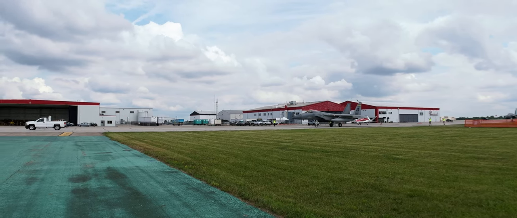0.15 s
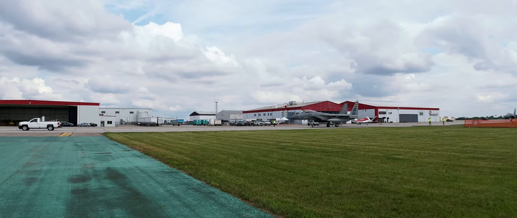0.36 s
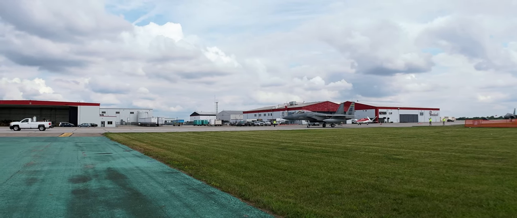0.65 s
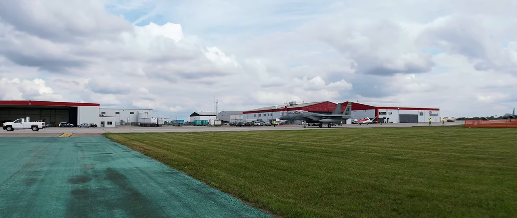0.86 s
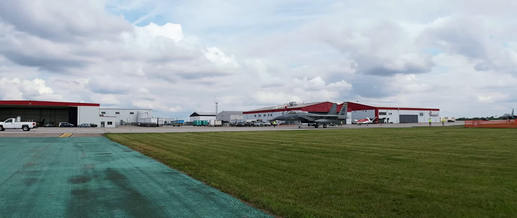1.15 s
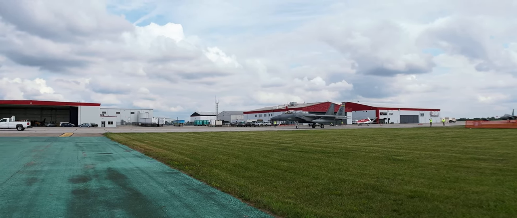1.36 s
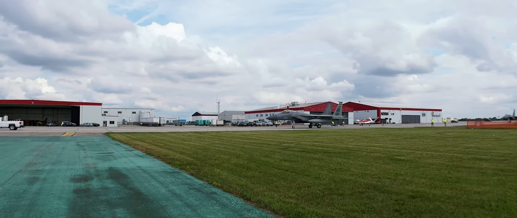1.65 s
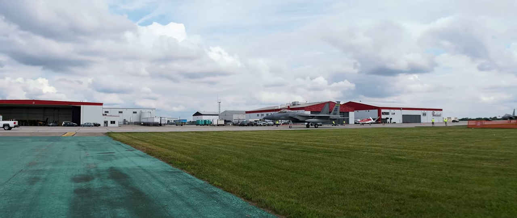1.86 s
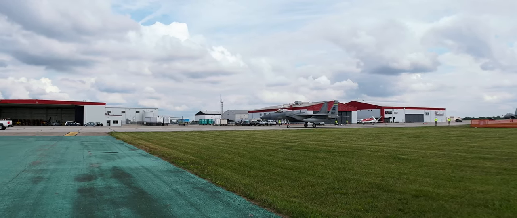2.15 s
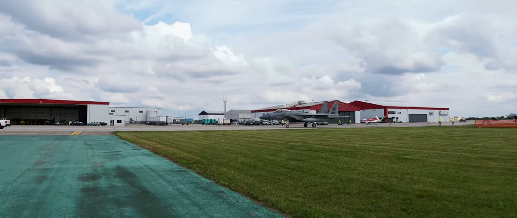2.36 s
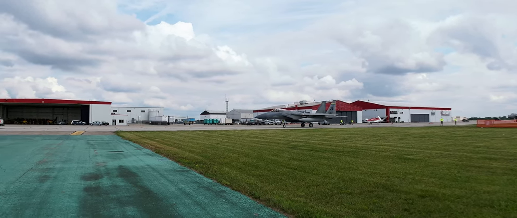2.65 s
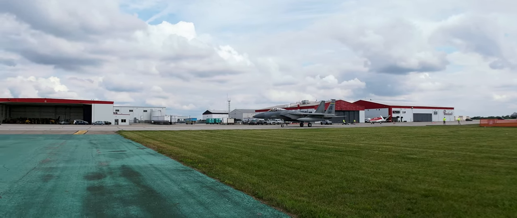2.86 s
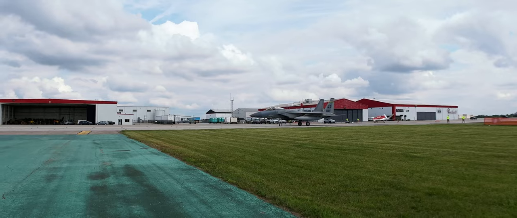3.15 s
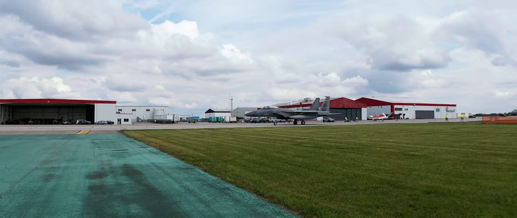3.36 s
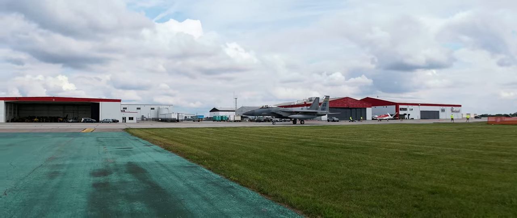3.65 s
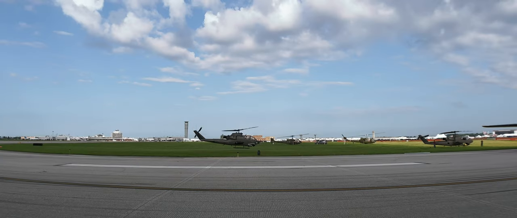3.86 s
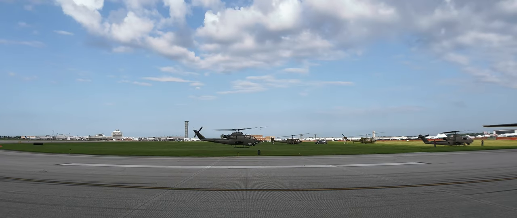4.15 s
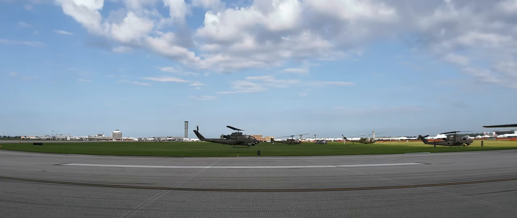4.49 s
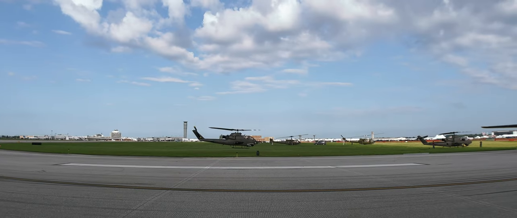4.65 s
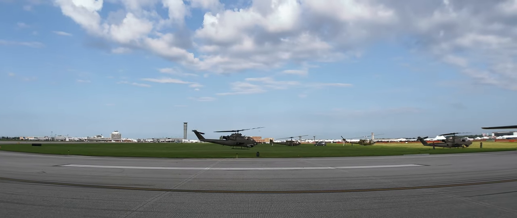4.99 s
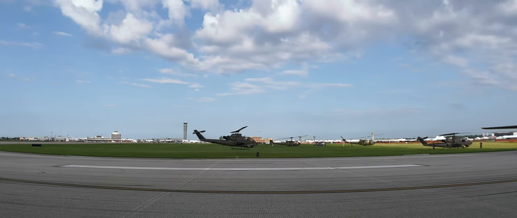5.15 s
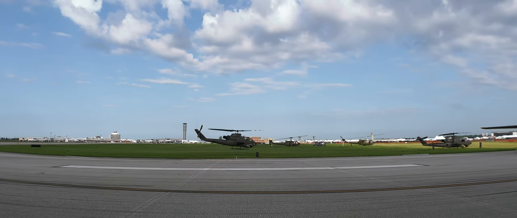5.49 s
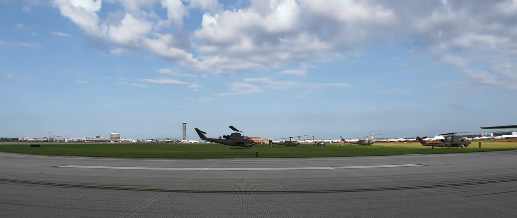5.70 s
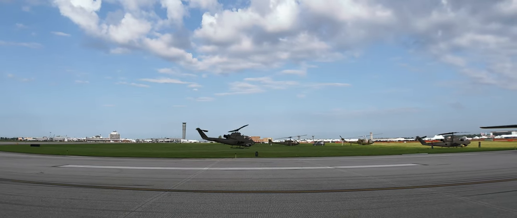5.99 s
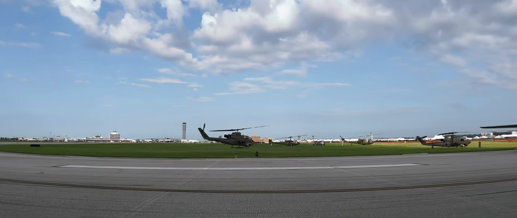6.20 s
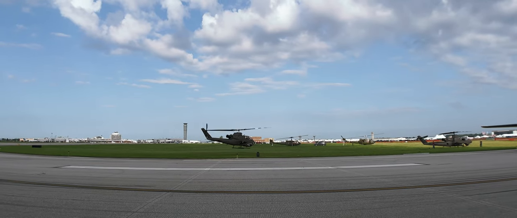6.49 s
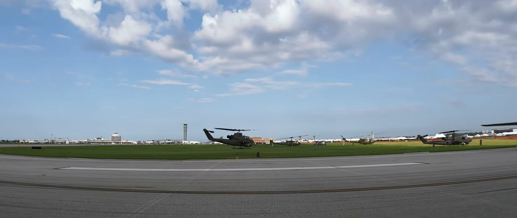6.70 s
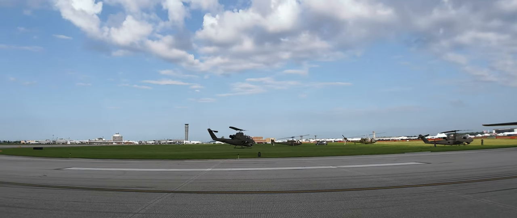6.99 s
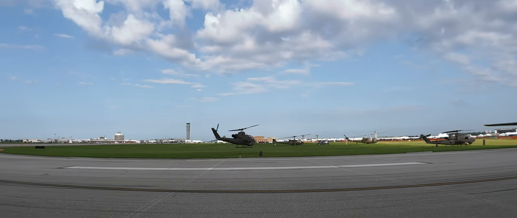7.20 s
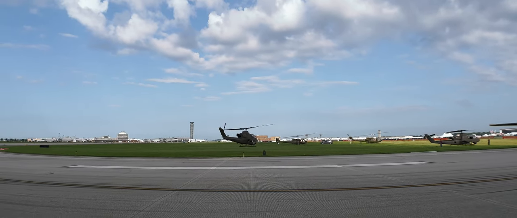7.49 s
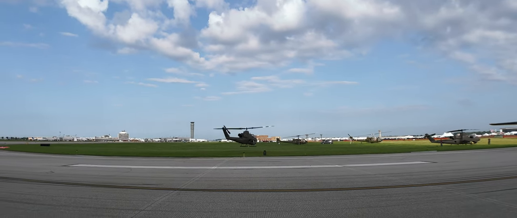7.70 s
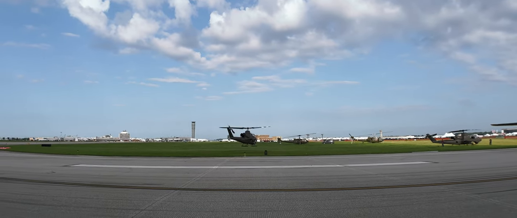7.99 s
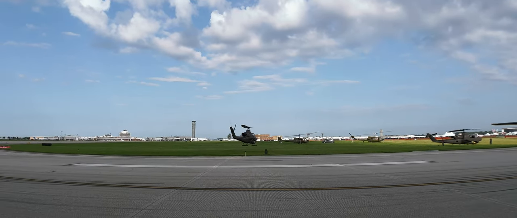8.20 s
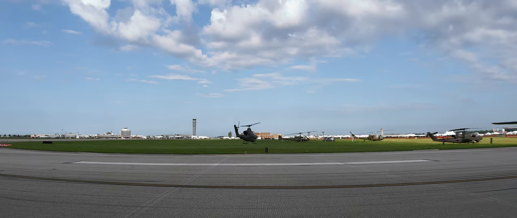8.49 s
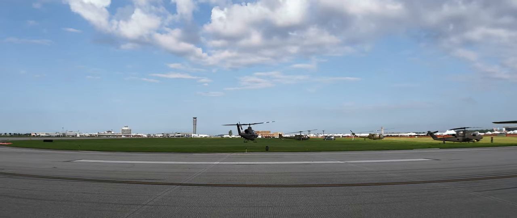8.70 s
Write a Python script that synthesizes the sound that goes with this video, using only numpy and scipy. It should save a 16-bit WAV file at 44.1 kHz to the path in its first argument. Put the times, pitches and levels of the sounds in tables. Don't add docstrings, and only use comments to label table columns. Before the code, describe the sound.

Quiet outdoor opening: wavering high jet whine and hiss, low gust rumbles and soft wind puffs right on a camera's microphones. A hard scene change brings a full, close helicopter hover, rapid even rotor chops over broad wash, raspy tail-rotor drone, faint very high turbine whistle and two dry grit ticks. Later the raspy wash eases, the tail buzz strengthens and sharp slaps mark every blade passage.

```python
import sys
import numpy as np
from scipy import signal
from scipy.fft import rfft, irfft, next_fast_len
from scipy.io import wavfile
from scipy.ndimage import uniform_filter1d

SR = 44100
rng = np.random.default_rng(int(sys.argv[2]) if len(sys.argv) > 2 else 0)


def wrap_up_sound(samples):
    columns = np.atleast_2d(samples).T
    tamed = np.clip(columns, -1, 1)
    steps = np.round(tamed * 32767).astype(np.int16)
    wavfile.write(sys.argv[1], SR, steps)


def voltage_ratio(decibels):
    exponent = np.asarray(decibels, float) / 20
    return 10 ** exponent


N = 389844
T = np.arange(N) / SR
SIZE = next_fast_len(N)
HZ = np.maximum(np.arange(SIZE // 2 + 1) * SR / SIZE, 1)

BLADE_HZ, BLADE_PASS_S = 10.8, 5.226
TAIL_HZ = 55.03


def unit(x):
    return x / np.sqrt(np.mean(x ** 2))


def curves(table):
    s, *columns = np.transpose(table)
    return [np.interp(T, s, column) for column in columns]


def step(mid_s, width_s):
    return 0.5 + 0.5 * np.tanh((T - mid_s) / width_s)


def walk(rate):
    count = int(T[-1] * rate) + 2
    return 1.24 * np.interp(T * rate, np.arange(count), rng.standard_normal(count))


def colour(x, points):
    hz, db = np.transpose(points)
    gain = voltage_ratio(np.interp(np.log(HZ), np.log(hz), db))
    return irfft(rfft(x, SIZE) * gain, SIZE)[:N]


def resonate(x, hz, width_hz):
    return signal.lfilter(*signal.iirpeak(hz, hz / width_hz, fs=SR), x)


def even(band):
    return band * band.std() / np.sqrt(uniform_filter1d(band ** 2, size=5000) + 1e-18)


def turbulence(points, anchors_hz, swings, shared_db, flicker_db, rate):
    spectrum = rfft(unit(colour(rng.standard_normal(N), points)), SIZE)
    out, shared = 0, shared_db * walk(rate)
    for hz in 30 * 2. ** np.arange(10):
        window = np.cos(np.pi / 2 * np.clip(np.log2(HZ / hz), -1, 1)) ** 2
        shares = [np.interp(np.log(hz), np.log(anchors_hz), row) for row in np.eye(len(swings))]
        swing = sum(share * curve for share, curve in zip(shares, swings))
        db = swing + shared + flicker_db * walk(rate * 1.7)
        band = irfft(spectrum * window, SIZE)[:N]
        out = out + voltage_ratio(db) * even(band)
    return out


def bursts(noise, times, dbs, rise_s, fall_s):
    out, u = np.zeros(N), np.arange(int(0.04 * SR)) / SR
    shape = (1 - np.exp(-u / rise_s)) * np.exp(-(u / fall_s) ** 2)
    for i, db in zip((np.array(times) * SR).astype(int), dbs):
        piece = noise[i:i + len(u)] * shape[:N - i]
        out[i:i + len(u)] += piece * voltage_ratio(db) / np.abs(piece).max()
    return out


def swells(lull_db, times, widths, dbs):
    t = T[::100, None]
    flat_tops = np.exp(-np.abs((t - times) / widths) ** 3)
    power = voltage_ratio(lull_db) ** 2 + np.sum(voltage_ratio(dbs) ** 2 * flat_tops, axis=1)
    return np.interp(T, t[:, 0], 10 * np.log10(power))


def ports(x, lead, balance_db, loose_db):
    spectrum = rfft(x, SIZE)
    turn = np.exp(0.5j * lead) * voltage_ratio(balance_db / 2)
    scatter = rng.standard_normal(3000) * np.exp(-np.arange(3000) / 700) / np.sqrt(350)
    loose = spectrum * rfft(scatter, SIZE) * voltage_ratio(loose_db)
    return irfft(np.array([spectrum * turn + loose, spectrum / turn - loose]), SIZE)[:, :N]


def jet():
    # (time [s], level [dB], treble against it [dB])
    air_currents = [(0, -30.5, -21), (.12, -26.5, -27), (.3, -26, -20.5), (.62, -28, -22.5),
                    (.8, -28, -15.5), (1.06, -33, -21), (1.25, -34, -19.5), (1.43, -37.5, -22),
                    (1.56, -32.5, -20), (1.85, -34, -16), (2.0, -28.5, -29), (2.12, -26.5, -17),
                    (2.37, -38.5, -14.5), (2.6, -36.5, -14.5), (2.76, -30, -26.5), (3.07, -38, -18),
                    (3.24, -34.5, -19.5), (3.83, -36.5, -16.5)]
    # (centre [Hz], width [Hz], level [dB])
    fan_bands = [(1297, 137, -20.5), (1580, 186, -17.5), (2760, 113, 0), (4475, 202, 0.5), (5547, 370, 0)]
    # (frequency [Hz], density [dB per Hz])
    hiss_colour = [(700, -16), (1000, -17), (1400, -5.5), (1900, -12), (2400, -8), (3400, -9.5), (5000, -4),
                   (7200, -1), (8600, -4.5), (10200, -9), (12500, -19.5), (13700, -30.5)]
    low_fan_db, low_fan_follows, upper_fan_db = -35, 0.3, -38
    lull_s, lull_depth_db = 1.29, 2.5
    recede_db_per_s, fan_tone_hz = -0.5, 2786

    second, treble = curves(air_currents)
    swell, air = second + 33, second + treble
    lull = lull_depth_db * np.exp(-((T - lull_s) / 0.25) ** 2)
    first = low_fan_db + low_fan_follows * swell - lull + recede_db_per_s * (T - 1.9)
    upper = upper_fan_db + 0.87 * swell + 0.13 * (air + 53)
    swings = [first + 37.1, upper + 37.9, air + 54.2]
    out = voltage_ratio(-39.5) * turbulence(hiss_colour, [2800, 6000, 11000], swings, 1.0, 0.87, 12)
    for (hz, width, db), level in zip(fan_bands, (first, first, first, second, upper)):
        band = resonate(resonate(rng.standard_normal(N), hz, 3 * width), hz, width)
        out = out + unit(even(band)) * voltage_ratio(db + level + 1.3 * walk(35))
    tone = np.sin(2 * np.pi * fan_tone_hz * T + 1.2 * walk(20))
    return out + tone * voltage_ratio(first - 3.5 + 2.0 * walk(8.5))


def wind():
    # (middle [s], half length [s], rumble [dB])
    gusts = [(0.08, 0.074, -29.5), (0.28, .1, -37), (0.468, 0.045, -37), (0.606, 0.072, -29),
             (.95, 0.1, -55), (1.164, 0.062, -44), (1.344, 0.046, -48.5), (1.454, 0.044, -47),
             (1.75, 0.28, -62), (2.02, 0.057, -50.5), (2.235, .03, -47), (2.392, 0.05, -49.5),
             (2.647, 0.091, -49), (2.85, 0.15, -50), (3.154, 0.034, -47.5), (3.316, 0.061, -42),
             (3.604, 0.13, -46), (3.807, .05, -41)]
    # (frequency [Hz], density [dB per Hz])
    rumble_colour = [(12, -49), (20, -66), (54, 3.5), (145, -1), (188, -7), (253, -7), (456, -17),
                     (1000, -36.5), (1300, -65), (2200, -120)]
    # (time [s], peak [dB])
    puffs = [(0.073, -36), (0.287, -32), (0.489, -41), (0.545, -41), (0.58, -45), (0.674, -21),
             (0.749, -32), (0.805, -27), (1.095, -24.5), (1.222, -37), (1.32, -35.5), (1.378, -42),
             (1.48, -37), (1.805, -36.5), (1.864, -41), (1.922, -37), (1.987, -27), (2.202, -31),
             (2.496, -26), (2.587, -28.5), (2.64, -30), (2.867, -36), (2.988, -36), (3.043, -31),
             (3.101, -37), (3.189, -31.5), (3.372, -30), (3.434, -38), (3.6, -50), (3.79, -27)]
    lull_db, flutter_lull_db = -66, -63.5
    flutter_under_gust_db, halo_under_puff_db, halo_s = -7.5, -19, 0.023

    s, db = np.transpose(puffs)
    gust = swells(lull_db, *np.transpose(gusts))
    halo = swells(flutter_lull_db, s + 0.02, halo_s, db + halo_under_puff_db)
    flutter = 10 * np.log10(voltage_ratio(halo) ** 2 + voltage_ratio(gust + flutter_under_gust_db) ** 2)
    rumble = voltage_ratio(-40.5) * turbulence(rumble_colour, [70, 300], [gust + 43, flutter + 49], 1.3, 2.4, 40)
    puff = colour(rng.standard_normal(N), [(60, -7), (200, -7), (500, -2.5), (900, -15), (2000, -65)])
    return rumble + bursts(puff, s - 0.002, db - 6.5, 0.0022, 0.012)


def main_rotor():
    # (time [s], rotor load [dB], nearness of the wake [dB])
    downwash = [(3.84, 2.5, 0), (4.05, 3.5, 1), (4.25, -0.5, -6), (4.4, 3.5, -2.5), (4.62, 1, 4.5),
                (5.1, 1, 3), (5.4, 3.5, 5.5), (5.75, 6, 1), (6, 1.5, -0.5), (6.3, -1.5, 10), (6.7, 2, 0.5),
                (7.3, -1, -0.5), (8.2, 1, -7), (8.84, 1, -8)]
    # (frequency [Hz], density [dB per Hz])
    roar_colour = [(25, -34), (50, -5), (110, -2.5), (250, 1.5), (450, -8), (800, -10.5), (1300, -17),
                   (1800, -14.5), (2600, -21.5), (3400, -30.5), (5200, -21), (7000, -28.5), (10000, -38),
                   (14500, -65)]
    # (frequency [Hz], density [dB per Hz])
    swish_colour = [(2500, -20), (5000, -18), (7000, 0.5), (9000, 2.5), (12000, -3.5), (13500, -3.5),
                    (15000, -27)]
    turn_mid_s, turn_s = 6, 0.23
    turn_roar_db, turn_swish_db = -4.5, -2.5
    gap, gap_turned = 0.36, 0.44
    thump_db, thump_shift_db, thump_mid_s = -44, -1, 5.5

    load, wake = curves(downwash)
    turned = step(turn_mid_s, turn_s)
    upper = 2.0 + 0.05 * load + turn_roar_db * turned
    turn = 2 * np.pi * BLADE_HZ * (T - BLADE_PASS_S)
    passing = np.exp(3.5 * (np.cos(turn - 0.45 + 0.3 * np.cos(turn) + 0.1 * walk(8)) - 1))

    roar = turbulence(roar_colour, [220, 700, 2200], [load, 1.07 * load + wake, upper], 1.0, 1.3, 40)
    roar = voltage_ratio(-30.5) * roar * voltage_ratio(3.06 * passing)

    swish_db = -48.5 + 0.13 * wake + turn_swish_db * turned
    opening = gap + (gap_turned - gap) * turned + passing * voltage_ratio(2.0 * walk(31))
    swish = unit(colour(rng.standard_normal(N), swish_colour)) * opening * voltage_ratio(swish_db + 5.0)

    push_db = thump_shift_db * step(thump_mid_s, 0.72) + 1.5 * walk(14)
    push = np.exp(60 * (np.cos(turn + 0.31) - 1)) * voltage_ratio(push_db)
    thump = colour(push, [(10, -60), (25, -34), (42, -8), (55, -7), (90, -2), (200, -25)])
    return roar + swish + voltage_ratio(thump_db + 4) * unit(thump)


def tail_rotor():
    # (time [s], second harmonic [dB])
    tail_swing = [
        (3.84, -36),
        (4.5, -41.5),
        (5.2, -39.5),
        (6, -38.5),
        (6.6, -33),
        (7.4, -30),
        (7.8, -25.5),
        (8.84, -22),
    ]
    second, = curves(tail_swing)
    first, third = -34 + 0.44 * (second + 27), -32 + 0.76 * (second + 28)
    cycles = TAIL_HZ * T - 0.27 + 0.006 * walk(4)
    levels = [first, second] + [third - 1.8 * k ** 1.56 for k in range(10)]
    out = 0
    for k, db in enumerate(levels, 1):
        sweep = 0.04 * k * k + 0.04 * k + 0.5
        out = out + np.sqrt(2) * voltage_ratio(db + 0.74 * walk(6)) * np.cos(2 * np.pi * (k * cycles + sweep))
    return out


def rasp():
    # (time [s], level [dB])
    rasp_levels = [(3.84, -32.5), (4.3, -37.5), (4.8, -28), (5.55, -29.5), (5.95, -33.5), (6.5, -42),
                   (6.9, -35.5), (7.5, -46.5), (8.84, -49)]
    # (frequency [Hz], density [dB per Hz])
    sunk_colour = [(300, 0), (560, 7), (900, 1), (1350, -15), (1800, -5), (2300, -9), (3000, -17.5),
                   (5000, -34)]
    nearer_ms, swing_mid_s, swing_s = 6.0, 5.12, 0.64
    sink_mid_s, sink_back_s, sink_s = 5.4, 6.3, 0.15

    db, = curves(rasp_levels)
    lead_ms = nearer_ms * step(swing_mid_s, swing_s) - 0.5
    cycles = TAIL_HZ * (T + lead_ms / 1000) + 0.45 + 0.02 * walk(30)
    gate = np.exp(2.1 * (np.cos(2 * np.pi * cycles) - 1)) * voltage_ratio(1.3 * walk(40))
    open_colour = [(200, -1.5), (450, -2), (780, 8), (1350, -10.5), (2000, -4.5), (3000, -17.5), (5000, -35)]
    plain = unit(colour(rng.standard_normal(N), open_colour))
    low = unit(colour(rng.standard_normal(N), sunk_colour))
    sunk = step(sink_mid_s, sink_s) - step(sink_back_s, sink_s)
    noise = (1 - sunk) * plain + sunk * low
    level_noise = noise / np.sqrt(uniform_filter1d(noise ** 2, size=500))
    return unit(level_noise * gate) * voltage_ratio(db)


def turbine():
    whistle_hz, off_beam_db, beam_db = 12262, -65, 17.5
    beam_s, beam_rise_s, beam_fall_s = 4.55, 0.9, 0.87
    band = even(resonate(rng.standard_normal(N), whistle_hz, 30))
    beam = np.exp(-((T - beam_s) / np.where(T < beam_s, beam_rise_s, beam_fall_s)) ** 2)
    return unit(band) * voltage_ratio(off_beam_db + beam_db * beam + 2.2 * walk(25))


def grit():
    # (time [s], peak [dB])
    ticks = [
        (4.21, -14),
        (5.124, -9.5),
    ]
    s, db = np.transpose(ticks)
    noise = colour(rng.standard_normal(N), [(600, 2), (2500, 0), (5500, -9), (8000, -19)])
    return bursts(noise, s, db, 0.00019, 0.0016)


def slaps():
    # (time [s], peak [dB], sharpness [dB])
    slap_events = [(5.494, -12, -3), (5.683, -21.5, -6), (5.766, -25.5, -10), (5.866, -20, -3),
                   (6.981, -22, 0), (7.074, -18.5, 2.5), (7.167, -19, 5.5), (7.257, -13.5, 1.5),
                   (7.35, -11, 4), (7.442, -11, 2), (7.536, -10.5, 1.5), (7.626, -12.5, 7), (7.718, -12, 0),
                   (7.813, -11, 0.5), (7.904, -12.5, -3), (7.998, -13.5, 0), (8.088, -12, 0.5),
                   (8.181, -11, -2), (8.272, -11.5, -1.5), (8.365, -16, 1.5), (8.455, -14, -0.5),
                   (8.55, -15, 2.5), (8.641, -18, 0), (8.734, -19, 0), (8.827, -11, -0.5)]
    edge_fades_db_per_s = -2.5
    s, strength, sharp = np.transpose(slap_events)
    peak = strength + 0.71 * sharp
    body = strength - 1.5 - 0.83 * sharp
    edge = -35 + 1.24 * (strength + 12) + 0.85 * sharp + edge_fades_db_per_s * np.maximum(s - 7.6, 0)
    ragged = voltage_ratio(2.3 * walk(300))
    crackle_colour = [(300, -16), (600, 4.5), (900, -2.0), (1400, -10), (2200, -8.5), (3500, -36.5), (6000, -48)]
    body_colour = [(100, -14), (220, 1.5), (380, 2.5), (600, -24.0), (1200, -54)]
    edge_colour = [(1500, -61), (2800, -2.5), (3700, -7.5), (5200, -0.5), (8000, -19.5), (14000, -23)]
    layers = ((peak - 1, 0.0095, crackle_colour), (body + 3, 0.010, body_colour), (edge + 9, 0.006, edge_colour))
    out = 0
    for db, fall_s, tone in layers:
        noise = colour(ragged * rng.standard_normal(N), tone)
        out = out + bursts(noise, s - 0.003, db, 0.0049, fall_s)
    return out


def blade_tip():
    since = (BLADE_HZ * (T - BLADE_PASS_S) % 1) / BLADE_HZ
    hz = 7400 - 200000 * (since - 0.008) + 150 * walk(400)
    chirp = np.sin(2 * np.pi * np.cumsum(hz) / SR) * np.exp(-((since - 0.011) / 0.004) ** 2)
    facing_away = np.minimum(((T - 6.7) / 0.95) ** 4, 1)
    return chirp * voltage_ratio(-39 - 21 * facing_away + 1.5 * walk(11))


def scene():
    # (frequency [Hz], left leads [radians], left minus right [dB], unrelated share [dB])
    port_pair = [(0, 0, 0, -30), (300, .1, .7, -19), (1000, .4, -.5, -9), (1400, .9, -4, -4),
                 (1750, .3, -4, -6), (2300, .3, -.5, -15), (4400, .1, 0, -25), (5800, -.9, 0, -12),
                 (7300, -1.7, 0, -8), (8600, -3.14, 0, -12), (10000, -4.6, 0, -8), (11600, -6.2, 0, -25),
                 (13500, -7.6, 0, -6), (16000, -8.2, 0, -6)]
    change_s = 3.838
    after = np.clip((T - change_s) / 0.004, 0, 1)
    helicopter = main_rotor() + tail_rotor() + rasp() + turbine() + grit() + slaps() + blade_tip()
    hz, *columns = np.transpose(port_pair)
    far = ports(jet() * (1 - after) + helicopter * after, *(np.interp(HZ, hz, c) for c in columns))
    return far + ports(wind() * (1 - after), -0.6, 0, -12)


def keep_strong(x, floor_hz, floor_db):
    hz, _, z = signal.stft(x, SR, nperseg=2048, scaling="psd")
    band_power = (np.abs(z[:1024]) ** 2).reshape(64, 16, -1).mean(axis=1)
    power = np.repeat(band_power, 16, axis=0)
    floor = voltage_ratio(np.interp(hz[:1024], floor_hz, floor_db)) ** 2 / 2
    kept = np.vstack([power > floor[:, None], power[:1] < 0])
    return signal.istft(z * kept, SR, nperseg=2048, scaling="psd")[1][:N]


def roll_off(x):
    return signal.sosfilt(signal.butter(12, 14820, fs=SR, output="sos"), x)


def record(dry):
    # (frequency [Hz], shared part [dB per Hz], left minus right [dB per Hz])
    quietest_kept = [(2000, -140, -140), (2250, -140, -86), (5300, -140, -86), (5500, -140, -140),
                     (7600, -96, -140), (11000, -96, -140), (11200, -96, -84), (13000, -97, -93),
                     (16000, -95, -106)]
    floor_hz, mid_floor, side_floor = np.transpose(quietest_kept)
    soft = np.tanh(1.335 * dry) / 1.282
    mid, side = (soft[0] + soft[1]) / 2, (soft[0] - soft[1]) / 2
    mid = colour(mid, [(7750, 0), (8100, -29), (8800, 0), (9050, 3.0)])
    mid = keep_strong(mid, floor_hz, mid_floor)
    side = keep_strong(side, floor_hz, side_floor)
    return roll_off(np.array([mid + side, mid - side]))


dry = scene()
out = record(dry)
wrap_up_sound(out)
```